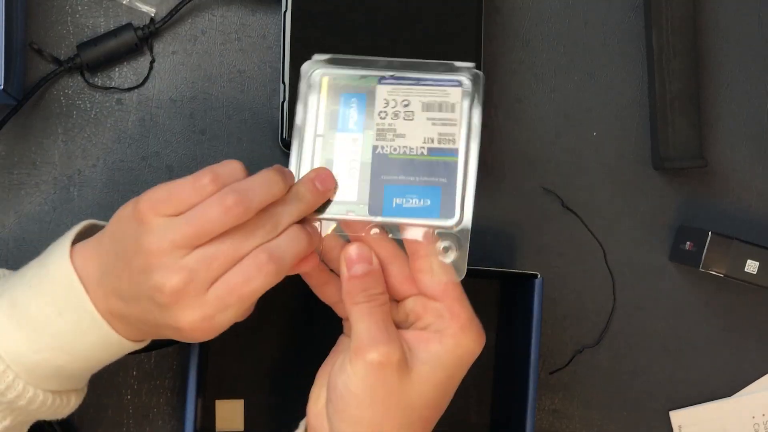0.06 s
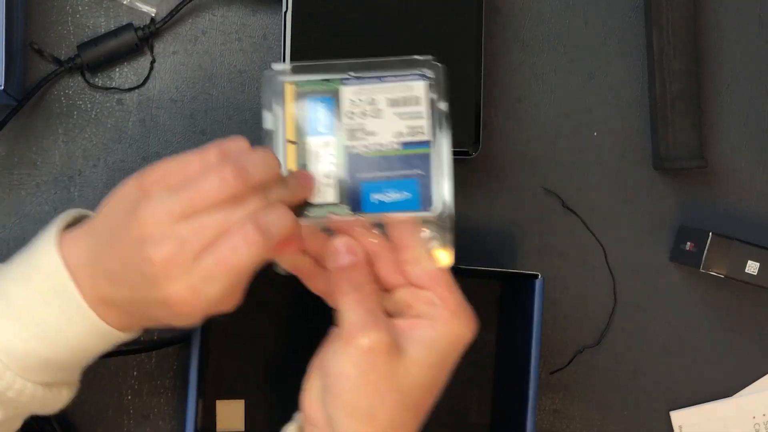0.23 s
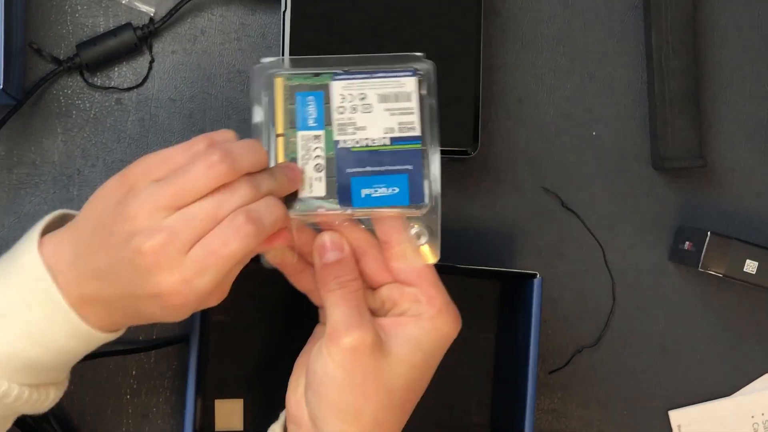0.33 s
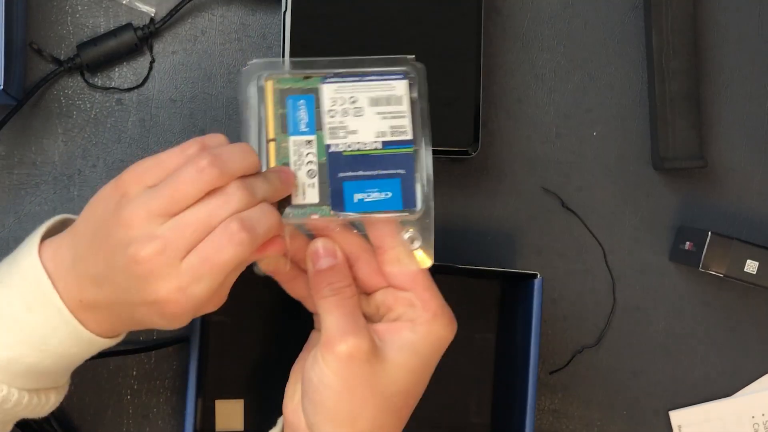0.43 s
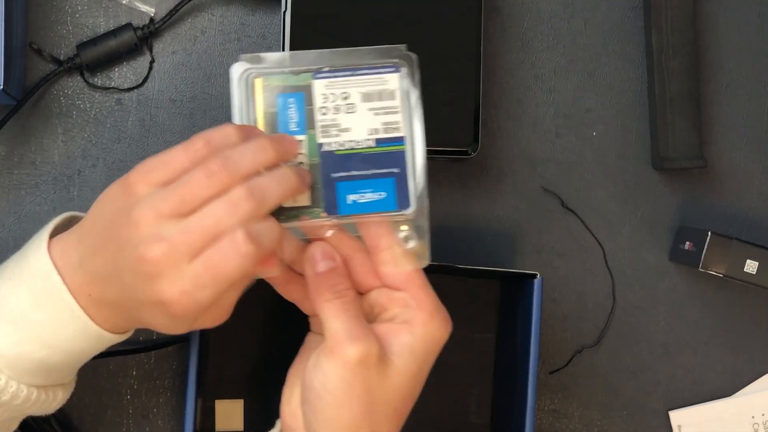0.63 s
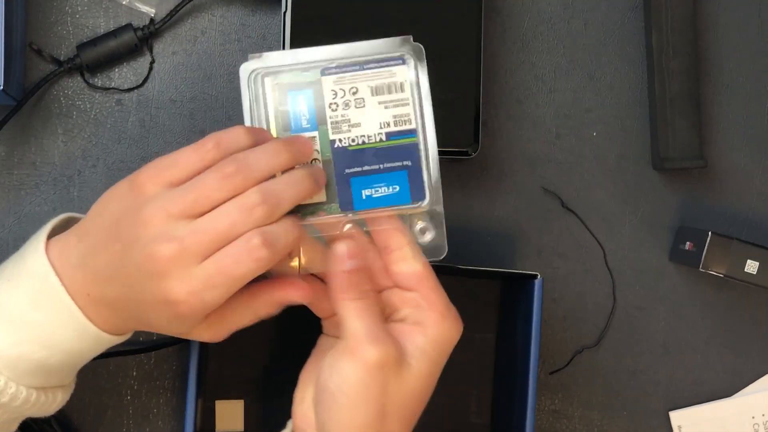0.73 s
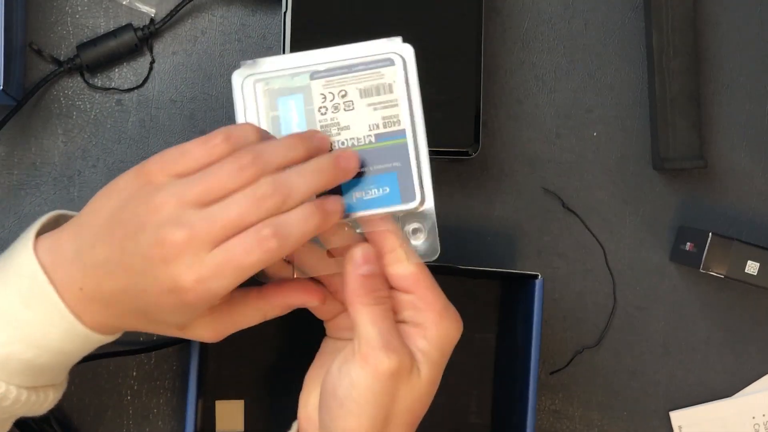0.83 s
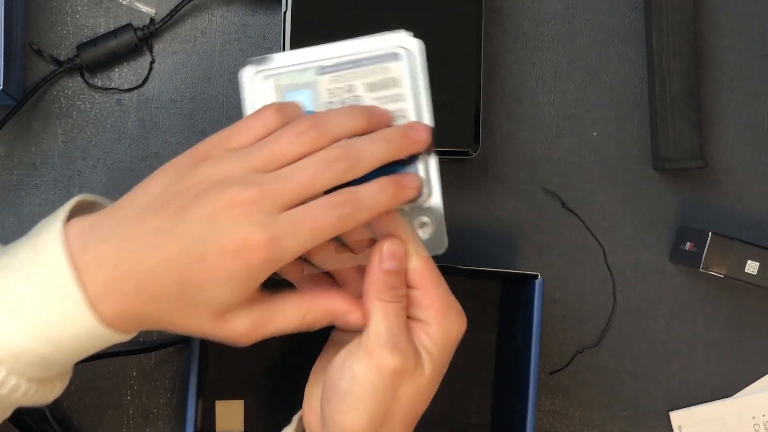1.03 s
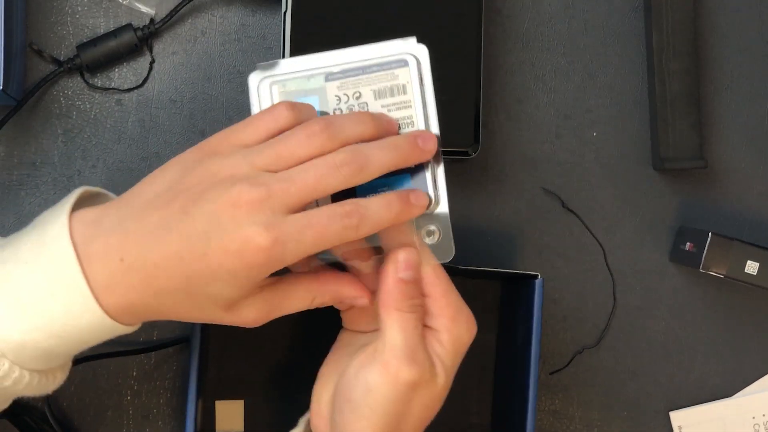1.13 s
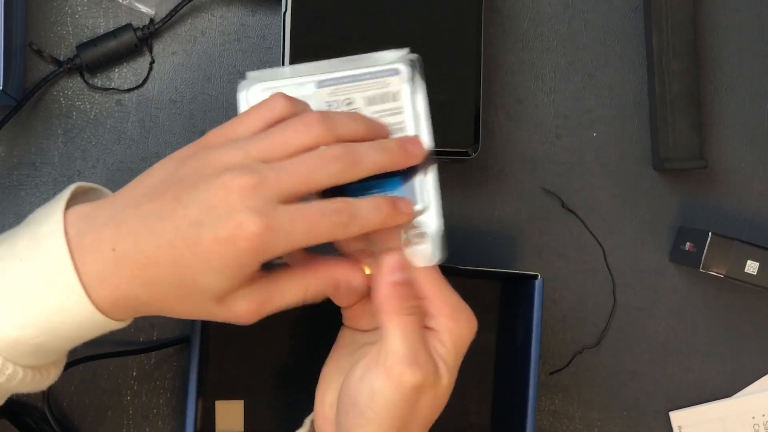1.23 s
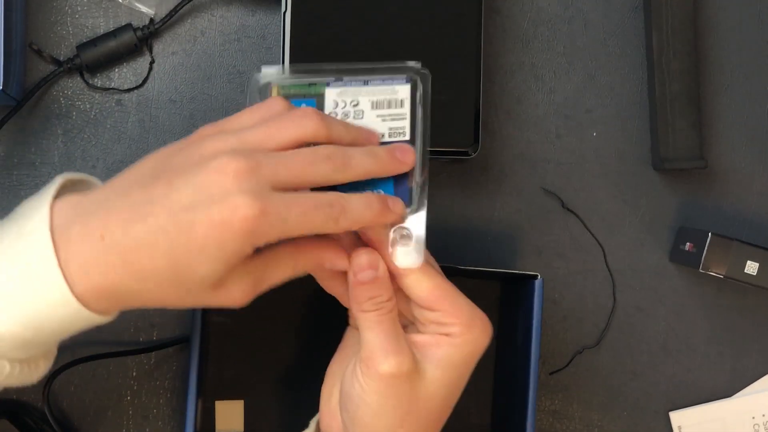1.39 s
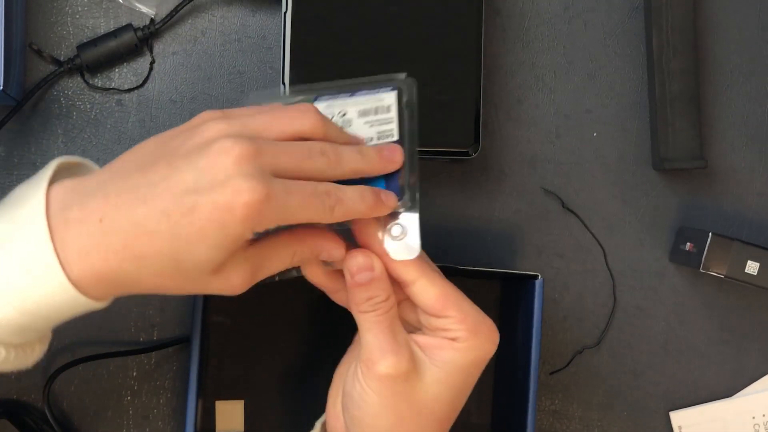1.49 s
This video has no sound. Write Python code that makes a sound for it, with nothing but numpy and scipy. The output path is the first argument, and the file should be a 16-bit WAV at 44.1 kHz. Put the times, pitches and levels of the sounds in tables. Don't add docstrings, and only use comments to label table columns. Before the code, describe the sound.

A rigid plastic pack is pried open: a loud two-stage crack, then a sharp pop of the lid a moment later, followed by faint finger ticks and rubbing, close microphone in a small quiet room.

```python
import sys
import numpy as np
from scipy import signal
from scipy.fft import rfft, irfft
from scipy.io import wavfile
from scipy.ndimage import uniform_filter1d

SR = 44100
rng = np.random.default_rng(int(sys.argv[2]) if len(sys.argv) > 2 else 0)


def to_wav(s):
    ch = np.atleast_2d(s).T
    pcm = np.round(np.clip(ch, -1, 1) * 32767)
    wavfile.write(sys.argv[1], SR, pcm.astype(np.int16))


def elevation(decibels):
    levels = np.asarray(decibels, float)
    return 10 ** (levels / 20)


N = 68355


def evened(x):
    return x / np.sqrt(np.mean(x ** 2) + 1e-20)


def peaked(x):
    return x / (abs(x).max() + 1e-20)


def read(points, hz):
    f, value = np.transpose(points)
    return np.interp(np.log(hz + 1), np.log(f + 1), value)


def add(mix, start, sound):
    part = mix[round(start * SR):][:len(sound)]
    part += sound[:len(part)]


def ring(x, hz, width):
    pole = np.exp((2j * np.pi * min(hz, .45 * SR) - np.pi * width) / SR)
    return 2 * signal.lfilter([1 - abs(pole)], [1, -pole], x + 0j).real


def coloured(x, points):
    gain = elevation(read(points, np.fft.rfftfreq(len(x), 1 / SR)))
    return irfft(rfft(x) * gain, len(x))


def slips(count, per_s, spread_db):
    u = rng.random((count, 3))
    sign = np.sign(u[:, 0] - .5)
    happens = u[:, 1] < per_s / SR
    size = elevation(-spread_db * np.log(u[:, 2] + 0.019))
    return sign * happens * size


# frequency in Hz, level in dB per Hz.
HUSH_COLOUR = [(30, -60.5), (100, -14.5), (200, -11), (320, -5), (800, -12), (2000, -16.5), (6000, -22),
               (16000, -33)]
HUSH_DB, PATCHY_DB = -60, 1.


def hush():
    frames, hz = N // 256 + 5, np.fft.rfftfreq(1024, 1 / SR)
    a, b, patches = rng.standard_normal((frames, 513, 3)).T
    patches = uniform_filter1d(patches, size=14, axis=0)
    patches = evened(uniform_filter1d(patches, size=8, axis=1))
    z = (a + 1j * b) * elevation(read(HUSH_COLOUR, hz)[:, None] + PATCHY_DB * patches)
    noise = signal.istft(z, nperseg=1024, noverlap=768)[1][:N]
    return elevation(HUSH_DB) * evened(noise)


# frequency in Hz, time to fall 60 dB in seconds.
ROOM_FALL = [(150, 0.35), (530, 0.12), (1400, 0.16), (3700, 0.23), (9700, 0.18), (16000, 0.04)]
ROOM_START_S = 0.0022
LATE_DB, LATE_STRETCH = -16.5, 1.3


def room(x):
    hz, t, z = signal.stft(rng.standard_normal(SR // 2), SR, nperseg=128)
    fall_db = -60 * t / read(ROOM_FALL, hz)[:, None]
    level = np.hypot(elevation(fall_db), elevation(LATE_DB + fall_db / LATE_STRETCH))
    tail = signal.istft(z * level, SR, nperseg=128)[1]
    tail = tail * np.clip(np.arange(len(tail)) / SR / ROOM_START_S - 1, 0, 1)
    return signal.fftconvolve(x, tail / np.linalg.norm(tail))[:N]


# time in seconds, level in dB.
SEAM_SENT = [
    (0.212, -3),
    (0.22, -1.5),
]
LID_SENT = [
    (0.525, -4.5),
]
# frequency in Hz, level in dB.
SEAM_SENT_COLOUR = [(100, -24), (500, -9.5), (1000, -9.5), (1700, -3), (3300, -4.5), (6000, -3), (9000, -5),
                    (16000, -5)]
LID_SENT_COLOUR = [(100, -30), (600, -10.5), (1200, -7.5), (2000, -10.5), (3500, -10), (6000, -18.5),
                   (9000, -27.5), (16000, -18.5)]


def reverberation(rows, colour):
    out = np.zeros(N)
    for start, db in rows:
        impulse = 1. * (np.arange(N) == round(start * SR))
        click = coloured(impulse, colour)
        out += elevation(db) * 2 * room(click / np.linalg.norm(click))
    return out


# time in seconds, level in dB.
RUB_LEVEL = [(0, -48), (0.033, -55.5), (.07, -61.5), (.18, -61), (.45, -69), (.72, -76), (.84, -62.5),
             (.865, -57.5), (.9, -64), (1.1, -63), (1.145, -60.5), (1.155, -46), (1.201, -63), (1.24, -59),
             (1.3, -56), (1.35, -61), (1.46, -61.5), (1.55, -66)]
# frequency in Hz, level in dB per Hz.
RUB_COLOUR = [(100, -10.5), (350, 6.5), (700, 4), (1300, 4), (2000, -0.5), (3500, -6), (7000, -16),
              (16000, -26)]


def rub():
    s, db = np.transpose(RUB_LEVEL)
    level = elevation(np.interp(np.arange(N) / SR, s, db))
    grains = slips(N, per_s=6000, spread_db=2.2)
    return level * evened(coloured(grains, RUB_COLOUR))


# start in seconds, length in seconds, level in dB, pitch in Hz, width in Hz.
SQUEAKS = [
    (1.258, .036, -62, 1950, 350),
    (.85, .04, -65, 1700, 900),
]


def squeak(start, length, level_db, hz, width):
    count = round(length * SR)
    noise = ring(ring(rng.standard_normal(4000), hz, width), hz, width)[:count]
    swell = np.sin(np.pi * np.arange(count) / count)
    return start, elevation(level_db) * evened(noise) * swell


# start in seconds, peak in dB, pitch in Hz, width in Hz, bright click in dB.
TICKS = [(0.01, -40, 940, 494, -62), (0.119, -46, 340, 300, -45), (0.6998, -54, 3900, 600, -41),
         (0.7398, -47, 1693, 387, -58), (0.8547, -48, 1660, 400, -68), (0.8637, -45.5, 1620, 406, -64.5),
         (0.9194, -49.5, 2620, 600, -48.5), (1.111, -58, 2440, 800, -58), (1.1533, -34.5, 2200, 1870, -47),
         (1.151, -47.5, 4000, 700, -52.5), (1.154, -47.5, 390, 300, -60), (1.25, -47, 1620, 500, -53.5),
         (1.272, -44, 1960, 300, -68), (1.284, -44.5, 1930, 300, -66), (1.2945, -35, 1770, 1210, -61),
         (1.3318, -48, 1020, 398, -70), (1.472, -57, 6370, 900, -64), (1.537, -51, 3420, 300, -66)]
TICK_S = .001


def tick(start, peak_db, hz, width, click_db):
    t = np.arange(600) / SR
    drive = rng.standard_normal(len(t)) * np.exp(-t / TICK_S)
    edge = ring(drive, hz=6500, width=7000)
    patch = ring(ring(drive, hz, width), hz, 2 * width)
    return start, elevation(peak_db) * peaked(patch) + elevation(click_db) * peaked(edge)


# peak in dB, pitch in Hz, time to fall 60 dB in seconds.
THUMPS = [(-15, 137, 0.025), (-24, 293, 0.029), (-73, 120, 0.021), (-22, 305, 0.025), (-53.5, 144, 0.047),
          (-19, 1200, .03), (-25, 900, .03), (-25, 2000, .035), (-34.5, 420, 0.074)]
THUMP_STARTS = [
    .2105,
    .2125,
    .5245,
    .526,
    .355,
    .2105,
    .211,
    .2108,
    .5255,
]


def thump(start, peak_db, hz, t60):
    t = np.arange(4000) / SR
    onset = np.clip(t / 0.0014, 0, 1)
    return start, elevation(peak_db - 60 * t / t60) * np.sin(2 * np.pi * hz * t) * onset


# start in seconds, peak in dB, first pitch in Hz,
# last pitch in Hz, length in seconds.
FLICKS = [
    (0.5241, -6.5, 1900, 4400, .0021),
    (0.5323, -11.5, 3300, 4000, .0012),
]


def flick(start, peak_db, from_hz, to_hz, length):
    u = np.arange(0, length, 1 / SR) / length
    turns = np.cumsum(from_hz + (to_hz - from_hz) * u) / SR
    swell = np.sqrt(np.sin(np.pi * u ** 1.5))
    return start, -elevation(peak_db) * np.sin(2 * np.pi * turns) * swell


# frequency in Hz, width in Hz, level in dB.
SEAM_TEAR = [(280, 160, -8.5), (900, 380, -1), (1490, 570, 0.5), (2760, 1500, -6.5), (4000, 700, -4.5),
             (6770, 700, -2.5), (8200, 370, -0.5), (11310, 710, -3.5), (13880, 1000, -12), (13890, 730, -6)]
SEAM_CRACK = [(1700, 500, -9), (4060, 210, 6), (6370, 200, 2.5), (7340, 860, 0.5), (9300, 1700, -6.5),
              (11200, 600, -34), (13400, 670, -3.5), (14390, 500, -22)]
LID_POP = [(568, 440, -14), (1120, 170, 0.5), (1735, 285, 0), (2540, 204, -1), (3490, 82, 0),
           (3870, 420, -11), (5580, 840, -8.5), (7880, 100, -7), (12100, 2000, -31), (15550, 900, -19)]
# start in seconds, peak in dB, rise in seconds,
# time to fall 60 dB in seconds, share of raw crackle in dB.
TEARS = [
    (0.2099, -5, .0023, .018, -9),
]
CRACKS = [
    (0.2195, -1.5, .0003, .016, -14),
]
POPS = [
    (0.5243, -11, .0010, .03, -20),
    (0.5263, -6, .0004, .005, -32),
    (0.5282, -15, .0004, .014, -26),
    (0.576, -33, .0006, .008, -24),
]
SUDDEN_S = .002
LEAD_SLIP = 3.5


def release(body, start, peak_db, rise, fall, crack_db):
    t = np.arange(2000) / SR
    lead = (np.arange(len(t)) == round(rise * SR)) & (rise < SUDDEN_S)
    drive = np.where(lead, LEAD_SLIP, slips(len(t), per_s=16000, spread_db=2))
    drive = drive * np.clip(t / rise, 0, 1) * elevation(-60 * np.maximum(t - rise, 0) / fall)
    shell = np.zeros(len(t))
    for k, (hz, width, db) in enumerate(body):
        shell += (-1) ** k * elevation(db) * ring(drive, hz, width)
    return start, elevation(peak_db) * peaked(evened(shell) + elevation(crack_db) * evened(drive))


def scene():
    hands, snaps = rub(), np.zeros(N)
    for row in SQUEAKS:
        add(hands, *squeak(*row))
    for row in TICKS:
        add(hands, *tick(*row))
    for start, row in zip(THUMP_STARTS, THUMPS):
        add(snaps, *thump(start, *row))
    for row in FLICKS:
        add(snaps, *flick(*row))
    for body, rows in ((SEAM_TEAR, TEARS), (SEAM_CRACK, CRACKS), (LID_POP, POPS)):
        for row in rows:
            add(snaps, *release(body, *row))
    wet = elevation(-12) * room(hands)
    wet += reverberation(SEAM_SENT, SEAM_SENT_COLOUR)
    wet += reverberation(LID_SENT, LID_SENT_COLOUR)
    return (hands + snaps + wet + hush())[None]


def roll_off(x):
    return signal.sosfilt(signal.butter(12, 16830, fs=SR, output="sos"), x)


def record(dry):
    bass_cut = signal.butter(2, 70, "high", fs=SR, output="sos")
    treble_cut = signal.firwin(255, 15950, window=("kaiser", 8), fs=SR)
    x = signal.sosfilt(bass_cut, dry)
    x = signal.oaconvolve(x, treble_cut[None], "same")
    return roll_off(x)


dry = scene()
out = record(dry)
to_wav(out)
```